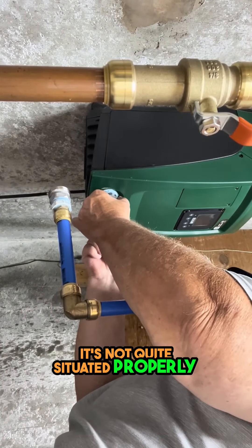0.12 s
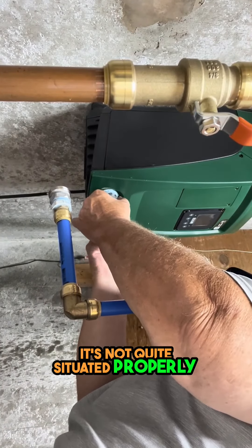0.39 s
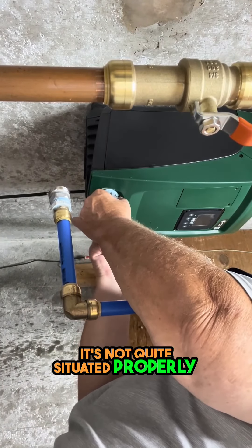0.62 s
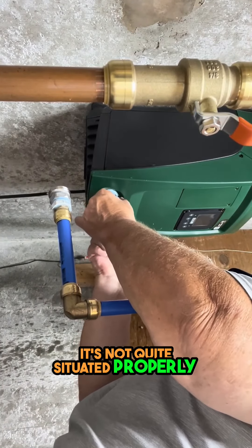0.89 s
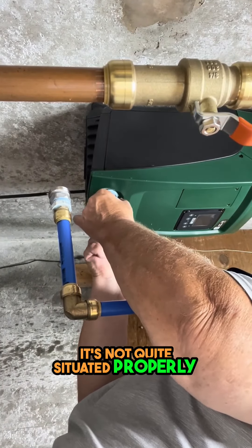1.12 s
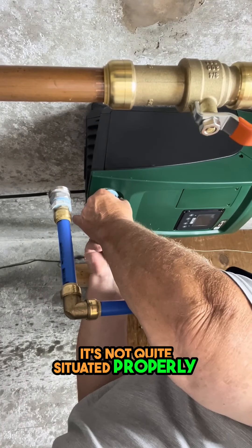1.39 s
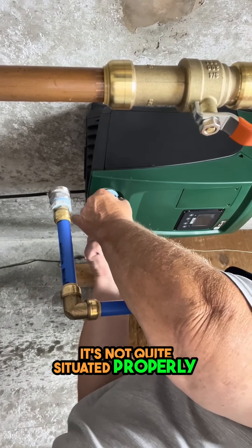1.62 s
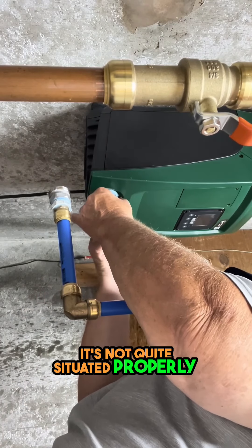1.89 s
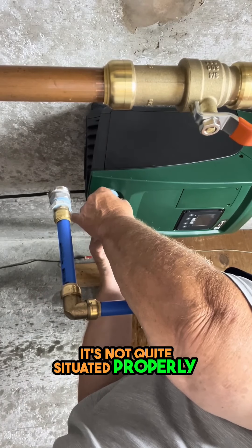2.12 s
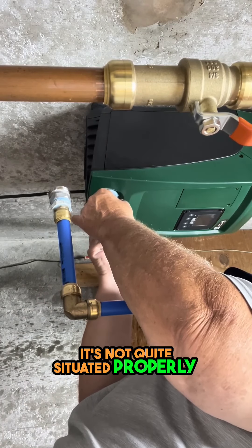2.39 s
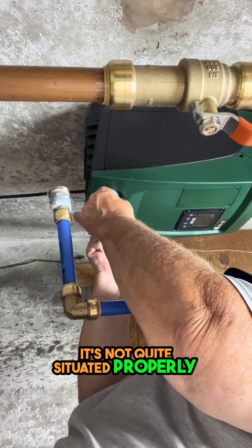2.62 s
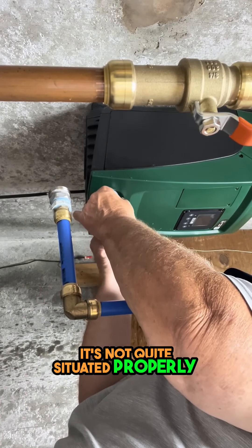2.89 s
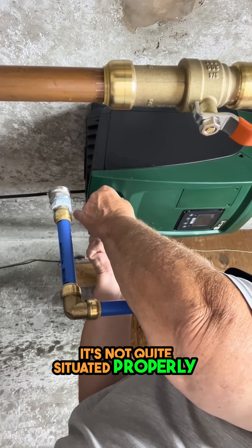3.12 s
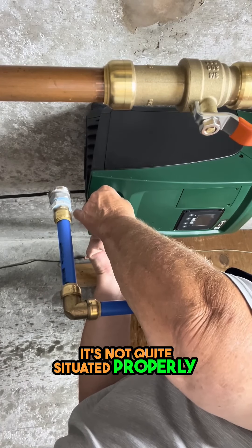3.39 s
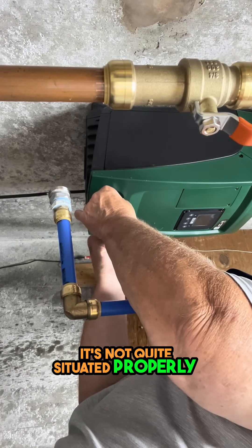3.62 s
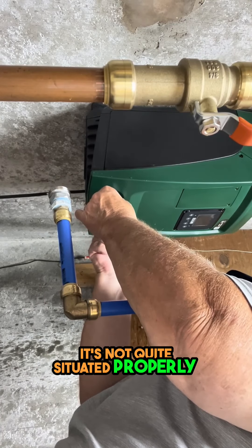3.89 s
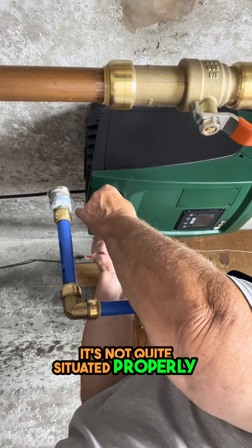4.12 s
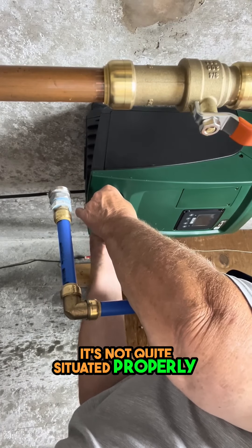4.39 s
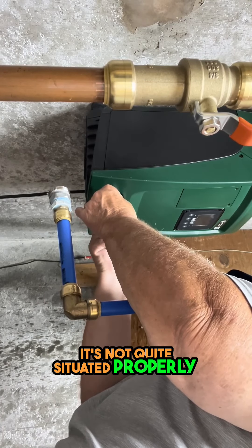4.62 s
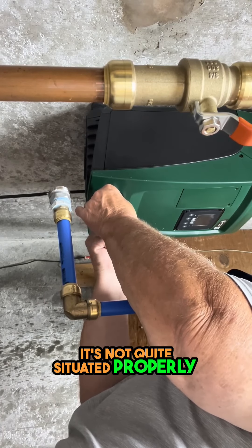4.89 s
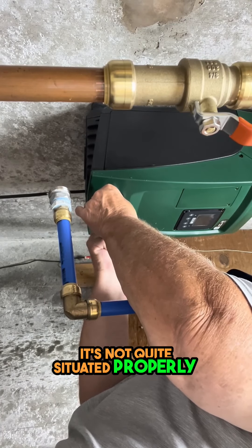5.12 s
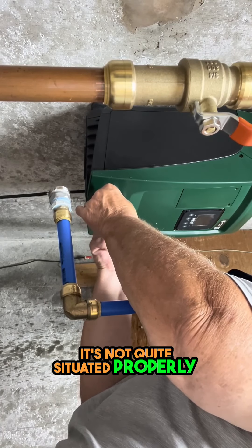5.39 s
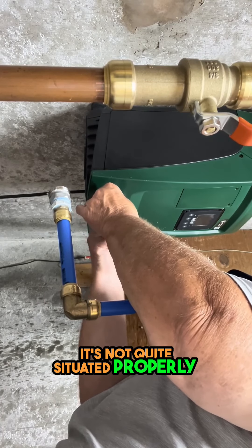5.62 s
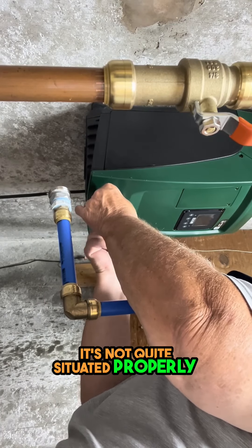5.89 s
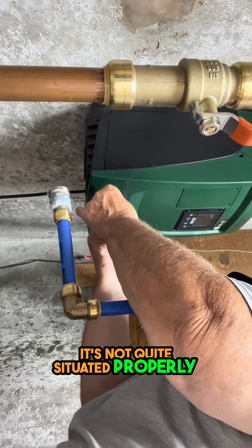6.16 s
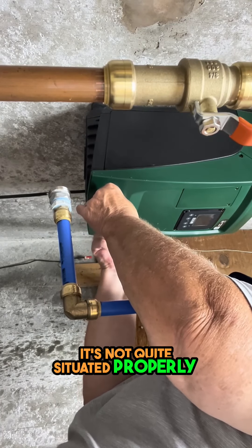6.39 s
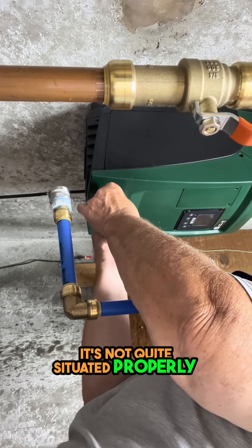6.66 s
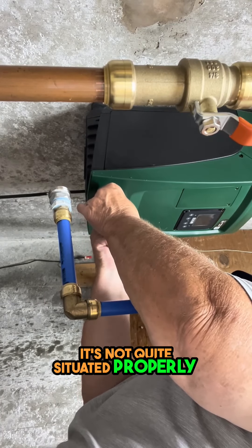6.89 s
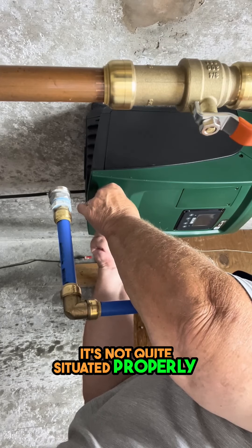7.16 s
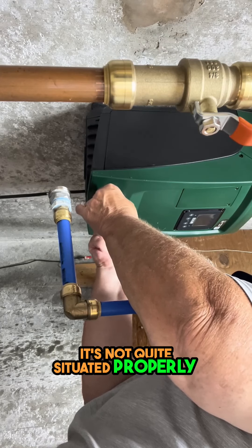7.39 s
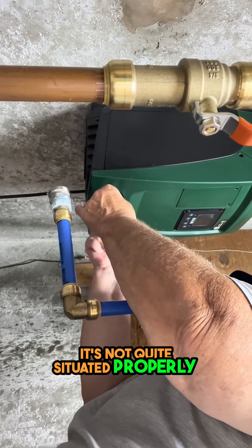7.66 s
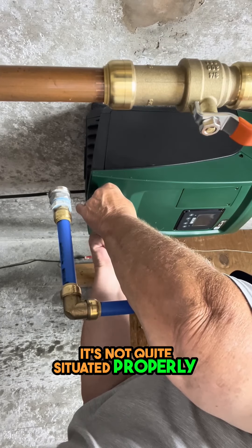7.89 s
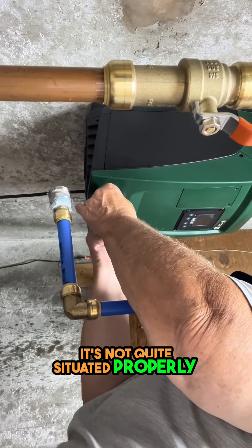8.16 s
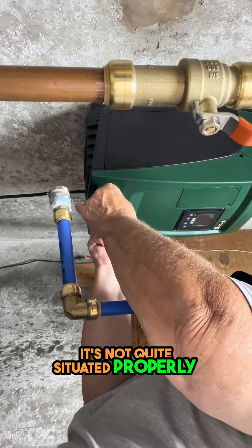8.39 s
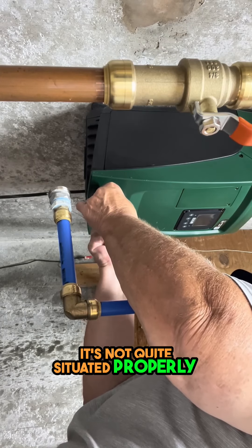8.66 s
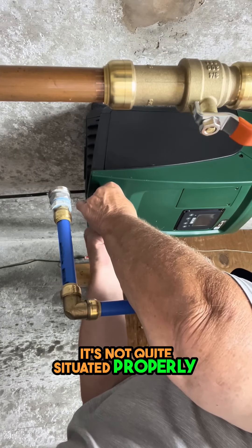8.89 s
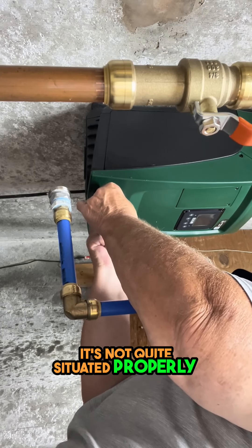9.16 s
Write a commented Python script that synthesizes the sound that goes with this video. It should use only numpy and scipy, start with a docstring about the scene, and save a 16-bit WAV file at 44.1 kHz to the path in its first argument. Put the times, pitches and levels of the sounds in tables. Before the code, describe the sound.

A threaded metal fitting is turned by hand in a hollow pump port, scraping and rubbing in short strokes with dull knocks, ending in a cluster of metallic clicks.

```python
"""In a bare concrete cellar, a threaded fitting is turned by hand in a pump port, close to a two-port phone.
The sticking and slipping thread shakes the hollow housing, the pipe and the brass: rough noise through
their resonances. Parts knock or tick, a brass collar rasps, fingers slide and the thread squeals once.
Shaped noise makes the low room rumble; a wavering hum and two faint whines are sine tones."""
import sys
import numpy as np
from scipy import signal
from scipy.fft import rfft, irfft, next_fast_len
from scipy.io import wavfile
from scipy.ndimage import uniform_filter1d, map_coordinates

SR = 44100
rng = np.random.default_rng(int(sys.argv[2]) if len(sys.argv) > 2 else 0)


def store_wav(level_fs):
    """Save 16-bit WAV to argv[1]."""
    pcm = np.round(np.clip(np.atleast_2d(level_fs), -1, 1) * 32767)
    wavfile.write(sys.argv[1], SR, pcm.T.astype(np.int16))


def volts(x):
    """Linear amplitude factor 10**(x/20) for a level x in dB, scalar or array-like."""
    e = np.asarray(x, float) / 20
    return 10 ** e


N = 408884  # length in samples
SIZE = next_fast_len(N + SR)  # spectrum length, with room for echoes to die away
HZ = np.arange(SIZE // 2 + 1) * SR / SIZE + 1e-3  # frequency of each spectrum bin


def unit(x):
    """Scale to rms 1."""
    return x / np.sqrt(np.mean(np.abs(x) ** 2))


def shape(table):
    """Gain over frequency, drawn through (Hz, dB) points."""
    hz, db = np.transpose(table)
    return volts(np.interp(np.log(HZ), np.log(hz), db))


def band(lo_hz, hi_hz):
    """Steep causal band-pass as a frequency response."""
    zeros, poles, gain = signal.butter(3, [lo_hz, hi_hz], "band", analog=True, output="zpk")
    return signal.freqs_zpk(zeros, poles, gain, HZ)[1]


def peaks(table):
    """Power over frequency of resonances given as (Hz, width in Hz, dB)."""
    power = 0
    for centre, width, db in table:
        damping = (width * HZ) ** 2
        power = power + volts(db) ** 2 * damping / ((centre ** 2 - HZ ** 2) ** 2 + damping)
    return power


def walk(rate):
    """Random levels, rate of them per second, joined by slopes; spread near 1."""
    k = int(SR / rate)
    steps = np.repeat(rng.standard_normal(N // k + 1), k)
    return uniform_filter1d(steps, k)[:N]


def swells(table, t):
    """Gain of (start, length, dB) swells: half sines with edges made abrupt by a power under 1."""
    gain = 0
    for start, length, db in table:
        half_sine = np.abs(np.sin(np.pi * np.clip((t - start) / length, 0, 1)))
        gain = gain + volts(db) * half_sine ** 0.43
    return gain


# Colour of the room rumble.
# Each row: frequency in Hz, relative level per Hz in dB.
ROOM_COLOUR = [(20, -41), (43, -14.5), (53, -4.5), (66, -10), (85, -8), (110, -12), (130, -7), (170, -20),
               (330, -29.5), (600, -35.5), (2000, -40), (2600, -47), (4500, -46.5), (5200, -56),
               (15800, -53)]


def rumble():
    """Room noise reaches both ports, nearly alike in the bass and less alike higher up."""
    mid, side = (rfft(rng.standard_normal(SIZE)) * shape(ROOM_COLOUR) for _ in range(2))
    apart = np.clip(HZ / 750.0, .06, .8)
    air = irfft(mid + apart * side * np.array([[1], [-1]]), SIZE)[:, :N]
    return volts(-65) * unit(air)


def hum():
    """A low tone near 53 Hz whose pitch and level waver."""
    hz = 53.45 + 2.53 * walk(6.1)
    level = volts(-68.5 + 0.78 * walk(5.4))  # rms
    return np.sqrt(2) * level * np.sin(2 * np.pi * np.cumsum(hz) / SR)


# Faint electric whines.
# Each row: frequency in Hz, rms level in dB.
WHINE_TONES = [(9450, -101), (12550, -102)]


def whines():
    """Two thin steady electric tones."""
    t = np.arange(N) / SR
    return sum(volts(db) * np.sqrt(2) * np.sin(2 * np.pi * hz * t) for hz, db in WHINE_TONES)


# Clear notes of the housing, pipe and brass.
# Each row: frequency in Hz, width in Hz without the hand, relative level in dB.
BODY_NOTES = [(133, 26, -1), (220, 41, -7), (260.8, 3.2, 2.5), (335.2, 3.6, 7), (372, 18, -5.5),
              (406.4, 18, -2), (471, 26, -7), (629.5, 1.4, -5.5), (710, 5.5, -10.5), (763, 2.3, -5.5),
              (1090, 30, -4), (1357, 1.7, -4), (1655, 12, -14), (1907, 9.1, -9.5), (2050, 8.7, -14.5),
              (2223, 16, -16.5), (2530, 31, -24), (3155, 240, -25.5), (3780, 85, -22.5), (4110, 50, -31),
              (5650, 560, -29.5), (6840, 240, -32), (9250, 730, -32.5), (14400, 1600, -44)]
# Wash of many small overlapping notes.
# Each row: frequency in Hz, relative level in dB.
BODY_WASH = [(100, -16), (190, -18.5), (240, 7.5), (295, -32), (400, -11.5), (1200, -10.5), (2100, -19),
             (2700, -28.5), (4600, -22), (5200, -36), (15500, -50)]


def body():
    """Housing, pipe and brass: notes add in power over a smooth wash; the gripping hand widens each note."""
    grip_damp_hz = 13
    power = peaks(np.add(BODY_NOTES, [0, grip_damp_hz, 0])) + shape(BODY_WASH) ** 2
    # Folding the cepstrum makes the response causal: it rings only after a push.
    cepstrum = irfft(np.log(power), SIZE)
    cepstrum[0] /= 2
    cepstrum[SIZE // 2:] = 0
    return np.exp(rfft(cepstrum))


def pick(hz, centre_hz, width):
    """Band of notes that a blow at one spot reaches; width is a share of the centre frequency."""
    spread = 1j * hz * centre_hz * width
    return (spread / (centre_hz ** 2 - hz ** 2 + spread)) ** 2


def blows(table, ring, chatter_db):
    """Each blow is a sharp touch and a short chatter that make the parts it reaches ring."""
    out, n = np.zeros(SIZE), 8192
    t = np.arange(n) / SR
    keep = (np.arange(n + 1) * SIZE / (2 * n)).astype(int)  # bins of the coarser spectrum
    fade = np.cos(np.pi / 2 * t * SR / n)
    for start, t60, parts in table:
        noise = rng.standard_normal(n)
        push = volts(chatter_db) * noise * np.abs(noise) * np.exp(-np.log(1000) * t / max(t60, .01))
        push[0] = 1  # the touch itself
        first = int(start * SR)
        for db, hz, width in parts:
            x = irfft(rfft(push, 2 * n) * pick(HZ[keep], hz, width) * ring[keep])
            out[first:first + n] += volts(db) * (x[:n] / np.abs(x).max()) * fade
    return rfft(out)


# Metal ticks.
# Each row: start in seconds, peak level in dB, centre in Hz, time to decay by 60 dB in seconds,
# width as a share of the centre.
TICK_BLOWS = [(2.99, -50, 10300, 0.12, 2), (4.62, -27.5, 4600, 0.089, 0.86), (7.424, -44, 5650, .08, .06),
              (8.557, -44.5, 3700, .06, .08), (8.645, -49, 8700, 0.16, .9), (8.69, -29.5, 6750, 0.077, 1.8),
              (8.723, -37, 9400, 0.15, 1.7), (8.786, -36, 7000, 0.13, 0.88), (8.825, -41, 11500, .12, 0.33),
              (8.843, -43, 12000, 0.16, 0.67), (8.937, -38.5, 6900, 0.091, 0.32),
              (8.968, -46, 12100, 0.083, 0.31), (8.987, -36, 9400, 0.11, 1.7),
              (9.005, -50, 10500, 0.18, 0.35), (9.068, -47.5, 9000, 0.059, 0.53),
              (9.103, -38, 6440, 0.062, 0.39), (9.129, -45, 6840, 0.073, 0.37),
              (9.154, -43, 7000, 0.17, 0.34), (9.2, -42.5, 7050, 0.14, 0.27),
              (9.23, -41.5, 9300, 0.092, 0.97)]


def ticks(ring):
    """Small bright metal blows, in which the wash of the body is partly evened out."""
    rows = [(start, t60, [(db, hz, width)]) for start, db, hz, t60, width in TICK_BLOWS]
    return blows(rows, ring / shape(BODY_WASH) ** 0.44, 0.0)


# Knocks of the fitting on the port.
# Each row: start in seconds, peak level in dB, centre in Hz, width as a share of the centre,
# housing thud in dB relative to the knock.
KNOCK_BLOWS = [(0.069, -52.5, 710, 0.53, -6), (0.071, -63.5, 1350, 0.29, -15),
               (0.869, -45.5, 1034, 0.97, -2.5), (1.038, -39.5, 920, 0.64, -8),
               (1.357, -45, 1030, 1.3, 1.5), (1.608, -52, 690, 0.36, 14.5), (1.793, -59, 410, 0.6, 11.5),
               (1.945, -55.5, 1050, 1.3, 3), (2.078, -62.5, 1050, 0.95, -2), (2.673, -48.5, 906, 0.82, 0.5),
               (2.833, -43.5, 1090, 1.5, -19), (2.835, -49.5, 1690, 0.12, -44), (3.842, -58, 920, 5.5, -1),
               (3.996, -52, 1090, 1.2, 7.5), (4.62, -35.5, 2450, 0.15, -21),
               (4.621, -28, 4000, 0.83, -12.5), (4.629, -32, 2430, .2, -18), (4.634, -37, 3850, 0.16, -24),
               (4.648, -45, 2380, 0.12, -21), (5.304, -51, 1090, 0.78, 3.5), (5.713, -49.5, 980, 0.21, 0),
               (5.842, -32.5, 850, 0.53, -3), (6.4, -40, 924, 0.42, -24.5), (6.433, -48.5, 958, 0.11, 9),
               (7.074, -42.5, 787, 1.2, -11), (7.411, -52, 770, 0.63, -1), (7.444, -29, 430, 0.45, -19),
               (7.682, -34.5, 1360, 1.2, -19), (7.685, -25, 360, 0.57, -24), (8.172, -54, 910, 1.6, -1),
               (8.376, -50, 1510, 3.7, 2), (8.528, -45.5, 1500, 0.6, 5.5), (8.574, -38.5, 1980, 0.26, -27),
               (8.81, -31.5, 1670, 0.28, -25), (8.806, -35, 2920, 0.24, -19),
               (8.825, -40.5, 2970, 0.12, -28), (8.924, -31, 1620, 0.55, -26),
               (8.949, -35.5, 2240, 0.35, -33), (9.028, -34.5, 2050, 0.1, -30),
               (9.045, -42, 2140, 0.25, -24), (9.186, -30, 1700, 0.26, -34),
               (9.197, -33.5, 1910, 0.57, -24), (9.211, -38, 1680, 0.4, -21),
               (9.225, -43.5, 1590, 0.44, -4)]


def knocks(ring):
    """The fitting hits the port: a knock, a housing thud near 300 Hz and a chatter lasting 0.13 s."""
    rows = []
    for start, db, hz, width, thud_db in KNOCK_BLOWS:
        rows.append((start, 0.13, [(db, hz, width), (db + thud_db, 300., .5)]))
    return blows(rows, ring, -19.5)


# The one squeal of the thread.
# Each row: start in seconds, length in seconds, level in dB.
SQUEAL_SWELL = [(8.665, 0.1, -48)]


def squeal(t):
    """Regular stick-slip: a wavering tone that climbs as the turn speeds up."""
    start_hz, climb_hz_per_s = 830, 500
    hz = start_hz + climb_hz_per_s * np.clip(t - SQUEAL_SWELL[0][0], 0, 1) + 41.0 * walk(120.)
    tone = np.sin(2 * np.pi * np.cumsum(hz) / SR)
    return volts(5.0 * walk(70.)) * tone * swells(SQUEAL_SWELL, t)


# Strokes where the brass collar rasps.
# Each row: start in seconds, length in seconds, level in dB, middle pitch of the upper ring in Hz.
RASP_STROKES = [(0.265, 0.2, -70.5, 6750), (0.662, .2, -68.5, 6940), (1.033, 0.18, -67.5, 6880),
                (1.091, 0.043, -54.5, 6900), (1.248, 0.14, -67, 6830), (2.542, 0.26, -73.5, 6870),
                (3.037, 0.14, -62, 6860), (6.489, 0.11, -74.5, 6660), (6.849, 0.2, -65.5, 6570),
                (7.297, 0.2, -72, 6480), (7.785, 0.16, -73.5, 6660)]
# Notes of the collar before its pitch shifts; the third is the upper ring.
# Each row: frequency in Hz, width in Hz, relative level in dB.
COLLAR_NOTES = [(3500, 570, -9), (4260, 120, 10), (6775, 96, 7.5), (9300, 630, -5.5)]


def rasp(fine, t):
    """Fine slips ring the collar, a little higher or lower with each grip and drifting within a stroke."""
    rows = np.array(RASP_STROKES)
    pitch = np.interp(t, rows[:, 0], rows[:, 3]) / COLLAR_NOTES[2][0] + .03 * walk(25.)
    response = unit(np.sqrt(peaks(COLLAR_NOTES)) * band(2340.0, 8500.0))
    ringing = irfft(rfft(fine, SIZE) * response, SIZE)[:N]
    # Reading the ringing faster or slower moves its pitch.
    shifted = map_coordinates(ringing, [np.cumsum(pitch)], order=3, mode="mirror")
    return shifted * swells(rows[:, :3], t)


# Fingers sliding on the fitting as the grip shifts.
# Each row: start in seconds, length in seconds, level in dB.
FINGER_SLIDES = [(1.25, 0.07, -74), (1.5, 0.062, -79), (1.6, .1, -81), (2.14, 0.066, -75),
                 (2.97, 0.054, -80), (4.78, 0.12, -78), (5.31, 0.15, -85), (5.55, 0.14, -77),
                 (8.35, 0.079, -79.5), (8.52, 0.055, -65.5)]


def finger_rub(grit, t):
    """Gain of the fingers' rub: it follows the grit and swells when they slide."""
    return volts(-9.5) * grit + swells(FINGER_SLIDES, t)


# Pushes of the hand on the fitting.
# Each row: start in seconds, time held in seconds, housing shake in dB, pipe in dB relative to
# the housing, thread grit in dB relative to the pipe.
HAND_PUSHES = [(0.082, 0.0043, -51.5, -25, -1.5), (0.262, 0.16, -57.5, -7, -7),
               (0.478, 0.35, -73, -4, -3.5), (0.727, 0.14, -58.5, -4.5, -10),
               (1.041, 0.13, -52.5, -8, -12.5), (1.106, 0.011, -51.5, -5, 1),
               (1.271, 0.054, -46.5, -11, -12.5), (1.37, 0.15, -61.5, -3.5, -12.5),
               (1.622, 0.004, -47, -12, -22), (1.799, 0.0048, -57.5, -17.5, -26),
               (1.885, 0.05, -60.5, -22, -4.5), (2.157, 0.077, -52, -3, -15),
               (2.283, 0.035, -47.5, -11, -10), (2.394, 0.02, -63.5, -7, -4), (2.501, 0.35, -65, -11, -0.5),
               (2.675, 0.088, -56, -8.5, -9), (2.835, 0.046, -55.5, -6, -20.5),
               (2.916, 0.015, -52, -10.5, -17), (3.002, 0.14, -58, -9.5, -2),
               (3.115, 0.035, -48, -11, -6.5), (3.246, 0.031, -58, -14.5, -46),
               (3.341, 0.031, -52.5, -1, -14.5), (3.446, 0.13, -50, -5.5, -16),
               (3.779, 0.087, -67.5, -22, 0), (4.021, 0.046, -53.5, -4.5, -16),
               (4.086, 0.13, -49, -5.5, -15.5), (4.23, 0.024, -48, -2.5, -14.5),
               (4.393, 0.031, -59, -12, -5), (4.584, 0.081, -50.5, -8, -25), (4.671, 0.031, -43, -4, -24),
               (4.632, 0.049, -57, -0.5, 2), (4.809, 0.096, -49.5, -3.5, -15),
               (5.134, 0.031, -59.5, -11, -6.5), (5.326, 0.092, -49, -2.5, -16.5),
               (5.45, 0.071, -48.5, -8, -12.5), (5.582, 0.061, -55, -6.5, -12),
               (5.722, 0.055, -44.5, -12.5, -17), (5.843, 0.0094, -41.5, -2, -18),
               (5.958, 0.032, -44, -3, -16.5), (6.164, 0.18, -55.5, -10, -7.5),
               (6.311, 0.0084, -48, -4.5, -24), (6.434, 0.015, -41, -12.5, -11),
               (6.511, 0.06, -46.5, -12, -13.5), (6.672, 0.0063, -55, -10, -9.5),
               (6.892, 0.088, -51, -6.5, -6), (7.07, 0.077, -51, -4.5, -21), (7.239, 0.012, -60, -6, -19.5),
               (7.332, 0.12, -58.5, -3, -11), (7.431, 0.012, -37, -1.5, -14.5),
               (7.475, 0.0053, -45.5, 2.5, -37), (7.554, 0.11, -49.5, -19.5, -9),
               (7.643, 0.093, -47.5, 2.5, -17.5), (7.715, 0.073, -48.5, -4, -29),
               (7.795, 0.14, -53.5, -2.5, -11), (7.959, 0.024, -50, -12, -9.5),
               (8.179, 0.019, -44, -7, -14.5), (8.385, 0.059, -55, -6.5, -15.5),
               (8.54, 0.062, -41.5, -2.5, -13.5), (8.679, 0.1, -49, -3.5, -8.5),
               (8.793, 0.031, -47, 1.5, -7.5), (8.869, 0.017, -46, -5.5, -19),
               (8.934, 0.0028, -63, 12, -1.5), (9.002, 0.15, -67, 6.5, 0), (9.194, 0.041, -55, 1, -2.5)]


def pushes(t):
    """Gains of housing, pipe and grit: pushes swell, hold and fade to a dying drag, adding in power."""
    rise_db_per_s, fall_db_per_s = 517, 260.5
    linger_db, linger_db_per_s = -20, 114
    start, held, shake_db, pipe_db, grit_db = np.transpose(HAND_PUSHES)[:, :, None]
    after = np.maximum(t - start - held, 0)
    fall_db = np.minimum(fall_db_per_s * after, linger_db_per_s * after - linger_db)
    fade_db = rise_db_per_s * np.maximum(start - t, 0) + fall_db
    levels = (shake_db, shake_db + pipe_db, shake_db + pipe_db + grit_db)
    return [np.sqrt(np.sum(volts(db - fade_db) ** 2, axis=0)) for db in levels]


def slips(per_s, scatter_db, patchy_db):
    """Stick-slip releases at random moments, a few of them bigger, in uneven patches."""
    when, size = rng.random(N), rng.exponential(1, N)
    sign = rng.choice([-1., 1.], N)
    share = np.clip((per_s / SR - when) * SR / 100, 0, 1)  # zero where nothing slips
    return unit(share * sign * volts(scatter_db * np.minimum(size, 4) + patchy_db * walk(45.)))


def wander(x):
    """The contact spot travels round the thread, so third-octave bands swell and sink on their own."""
    spectrum = rfft(x, SIZE)
    thirds = np.clip(3 * np.log2(HZ / 200), 0, 19)
    out = 0
    for k in range(20):
        part = irfft(spectrum * np.clip(1 - np.abs(thirds - k), 0, 1), SIZE)[:N]
        out = out + volts(2.5 * walk(14)) * part
    return out


def thread(ring):
    """One rough contact shakes each part of the assembly; grit and rub ride on the pipe's motion."""
    t = np.arange(N) / SR
    housing, pipe, grit = (np.interp(t, t[::100], gain) for gain in pushes(t[::100]))
    coarse = wander(slips(534.0, 2.85, 2.9))
    fine = wander(slips(5150.0, 1.2, 2.94))
    # Each part: gain, roughness, lowest and highest Hz.
    parts = [(housing, coarse + 0.61 * fine, 195., 560.),
             (pipe, coarse + 1.25 * fine, 560., 2400.),
             (grit, 0.15 * coarse + fine, 2500., 7500.),
             (finger_rub(grit, t), fine, 7500., 15800.)]
    out = rfft(rasp(fine, t), SIZE)
    for gain, rough, lo_hz, hi_hz in parts:
        out = out + rfft(unit(rough) * gain, SIZE) * unit(ring * band(lo_hz, hi_hz))
    return out


def tail(t60):
    """Echoes of the walls: decaying noise with unit energy, as a frequency response."""
    t = np.arange(SR // 2) / SR
    x = rng.standard_normal(len(t)) * np.exp(-np.log(1000) * t / t60)
    return rfft(x / np.sqrt(np.sum(x ** 2)), SIZE)


# Phase between the two ports.
# Each row: frequency in Hz, radians by which the left leads.
LEFT_LEAD = [(0, 0), (1100, -.5), (2300, -.9), (4400, -1.6), (4900, -3.14), (5500, -4.2), (7800, -4.2),
             (10400, -5.9), (11800, -6.28)]
# Level between the two ports.
# Each row: frequency in Hz, left minus right in dB.
LEFT_EXCESS = [(60, -1.5), (350, 2), (2000, 1), (4000, 0), (9000, -0.5)]


def at_ports(work, ring):
    """The work reaches the ports a little apart; the long pipe and the walls add an unrelated share."""
    lead = np.interp(HZ, *np.transpose(LEFT_LEAD))
    tilt = np.sqrt(shape(LEFT_EXCESS)) * np.exp(.5j * lead)  # half the difference for each port
    reach = np.clip(HZ / 2540.0, .1, 1) * np.clip(2300.0 / HZ, .85, 1)
    walls = volts(-5.5) * reach * np.array([tail(0.18), tail(0.18)])
    spread = volts(-21) * reach * thread(ring) * np.array([tilt, -1 / tilt])
    return irfft(work * (np.array([tilt, 1 / tilt]) + walls) + spread, SIZE)[:, :N]


def scene():
    """The work on the fitting over the sounds of the cellar."""
    background = rumble() + hum() + whines()
    ring = body()
    squealing = rfft(squeal(np.arange(N) / SR), SIZE)
    work = thread(ring) + knocks(ring) + ticks(ring) + squealing
    return at_ports(work, ring) + background


def top_cut(x):
    """Nothing passes above the cut-off."""
    return signal.sosfilt(signal.butter(12, 16390, fs=SR, output="sos"), x)


def record(dry):
    """The phone cuts the top, above 15800 Hz."""
    low_pass = signal.ellip(10, .2, 70, 15800, fs=SR, output="sos")
    mix = signal.sosfilt(low_pass, dry)
    return top_cut(mix)


dry = scene()
out = record(dry)
store_wav(out)
```